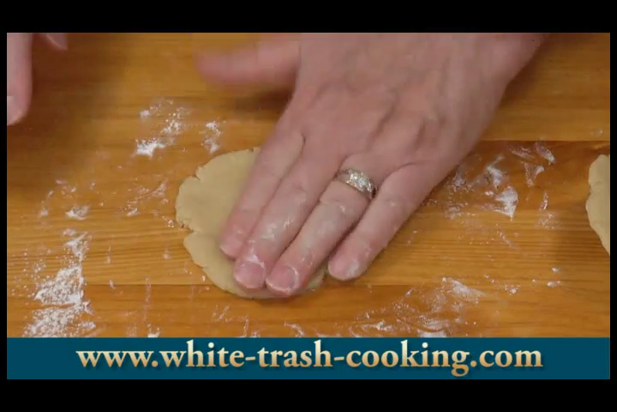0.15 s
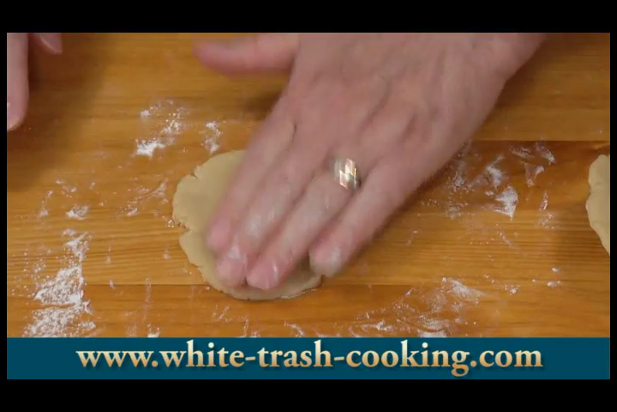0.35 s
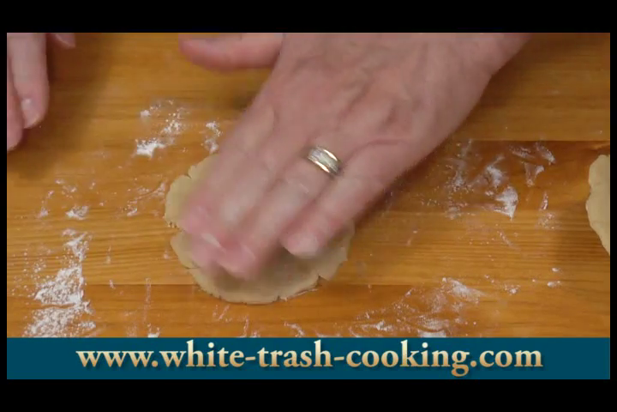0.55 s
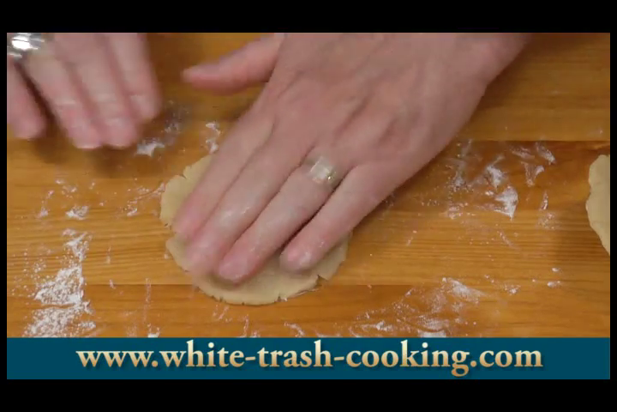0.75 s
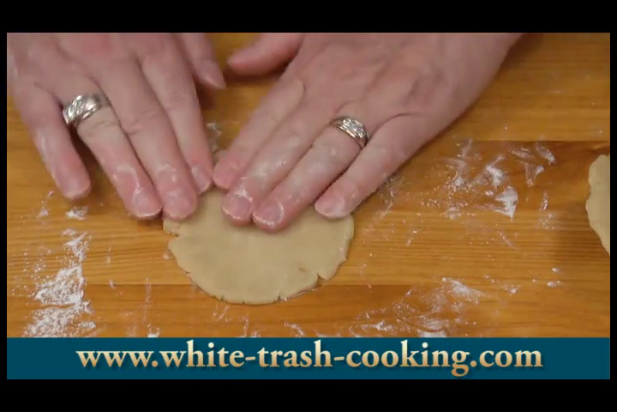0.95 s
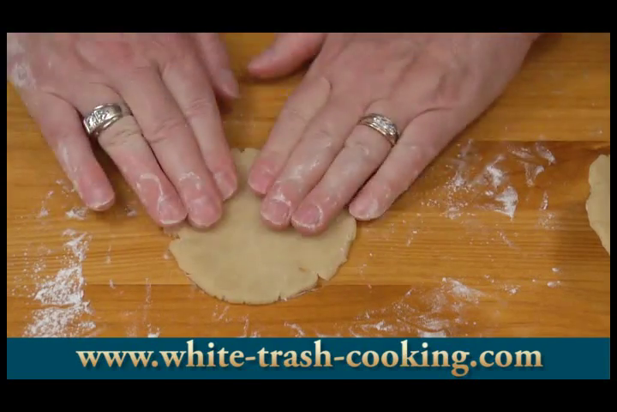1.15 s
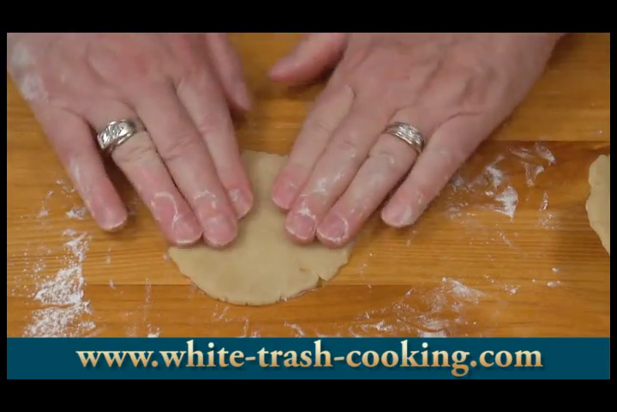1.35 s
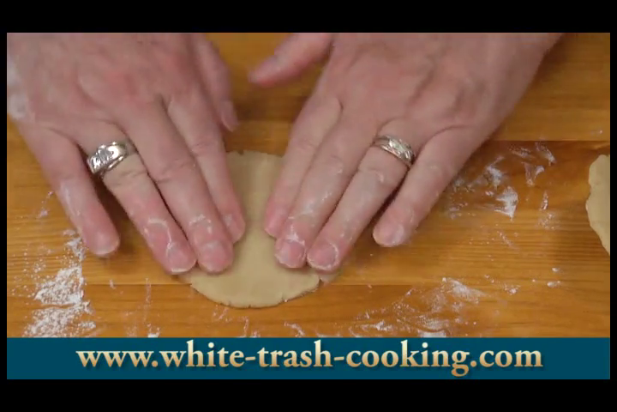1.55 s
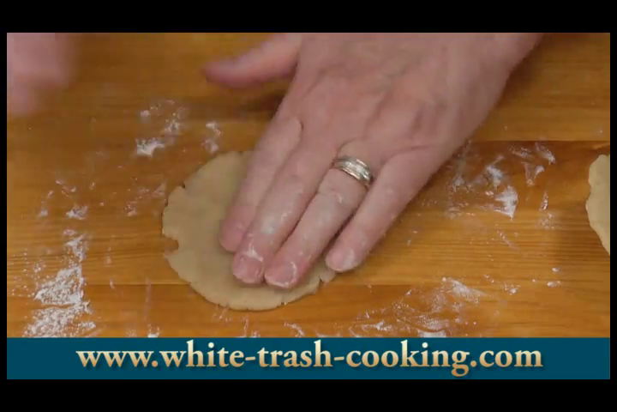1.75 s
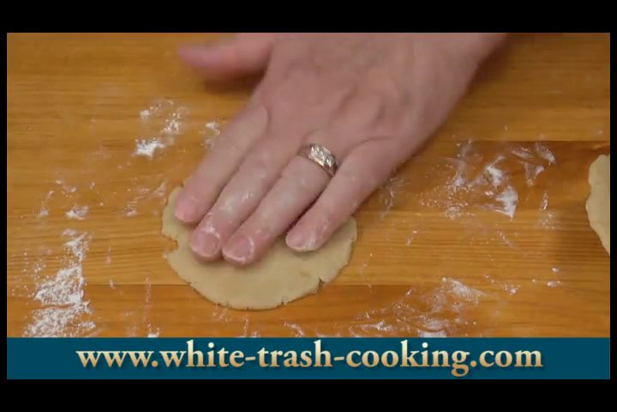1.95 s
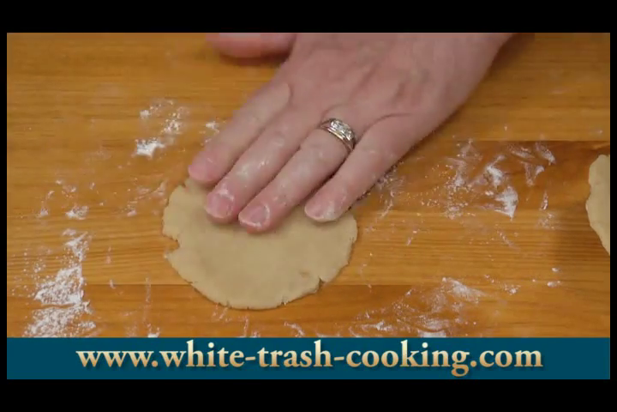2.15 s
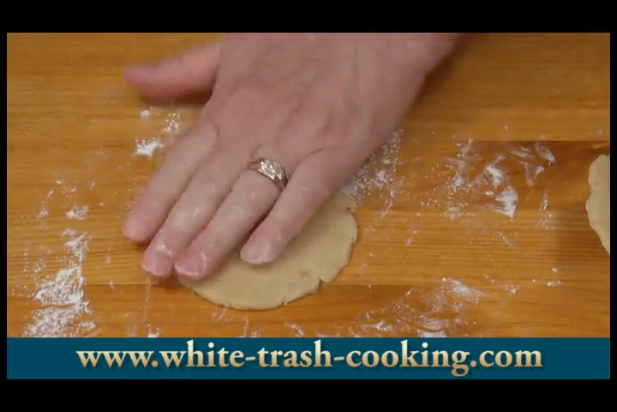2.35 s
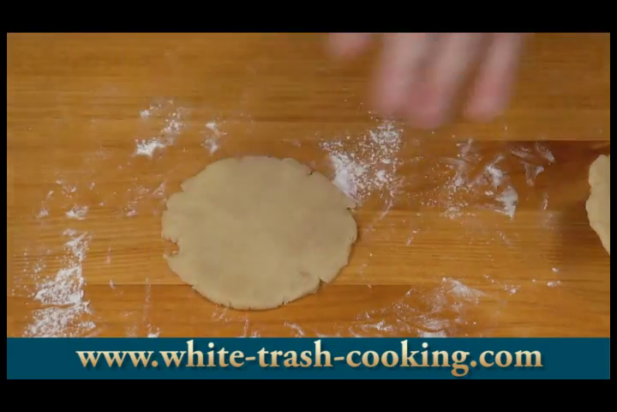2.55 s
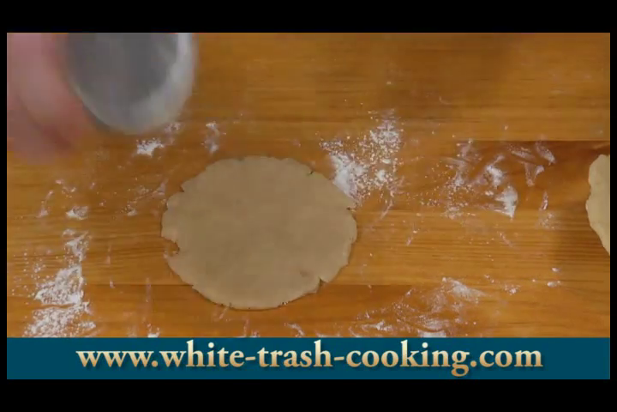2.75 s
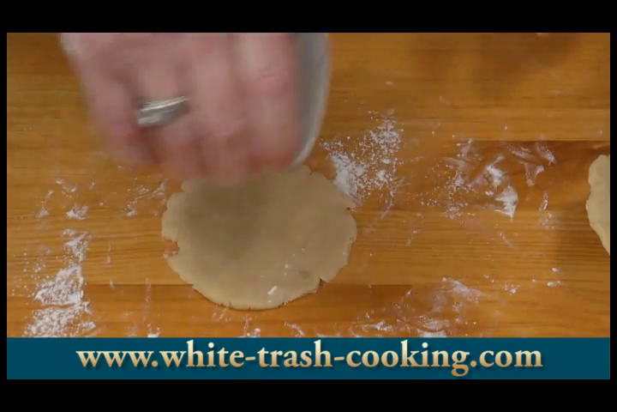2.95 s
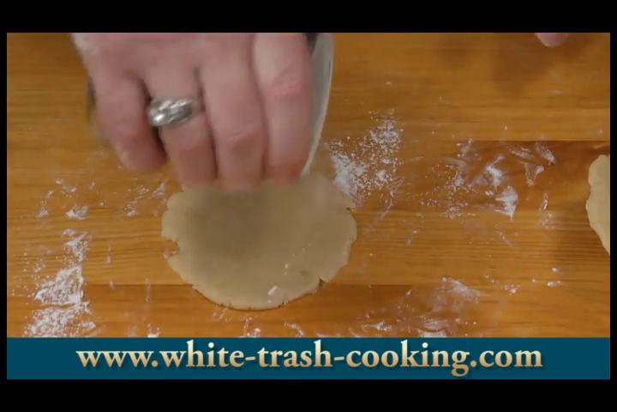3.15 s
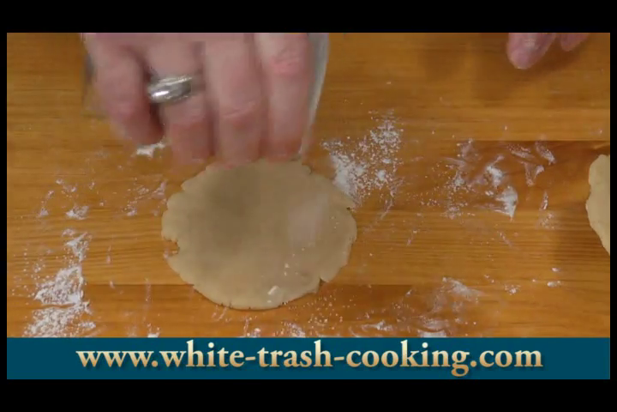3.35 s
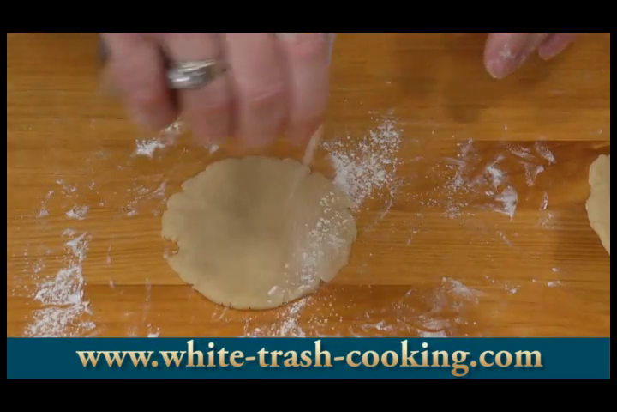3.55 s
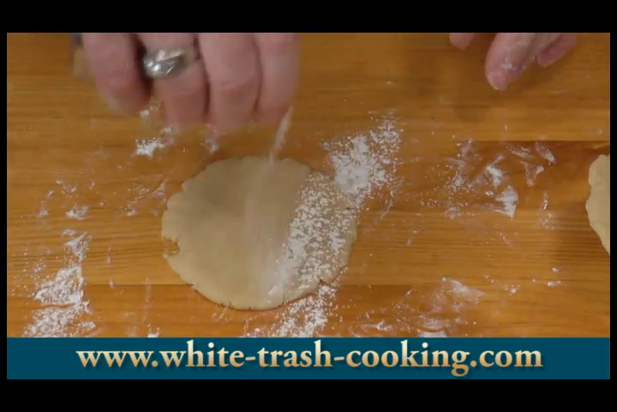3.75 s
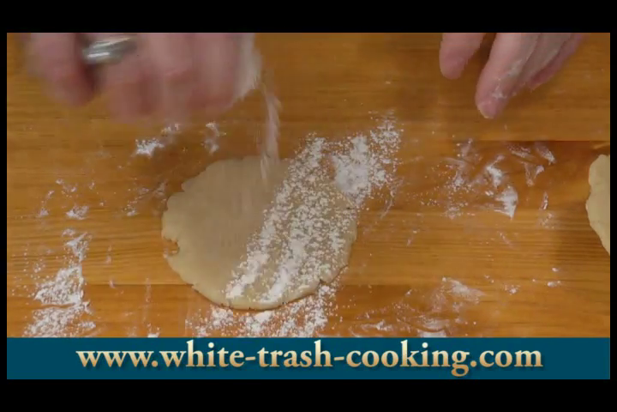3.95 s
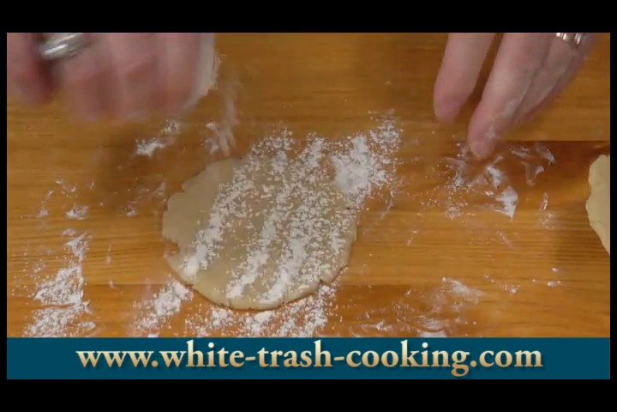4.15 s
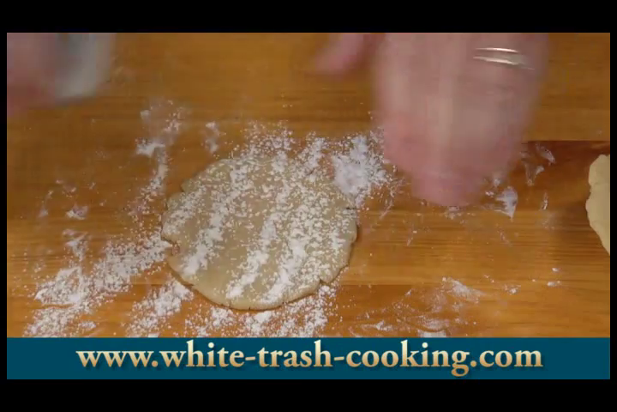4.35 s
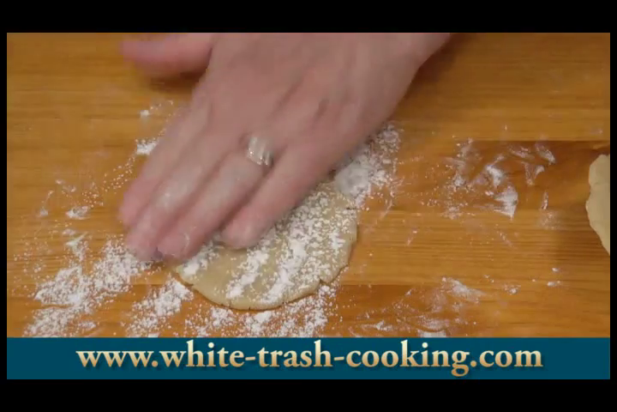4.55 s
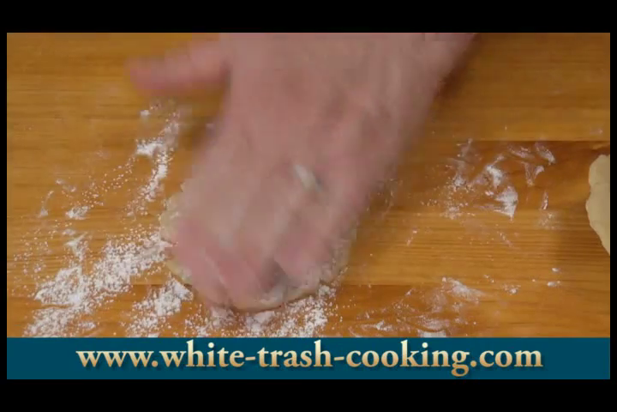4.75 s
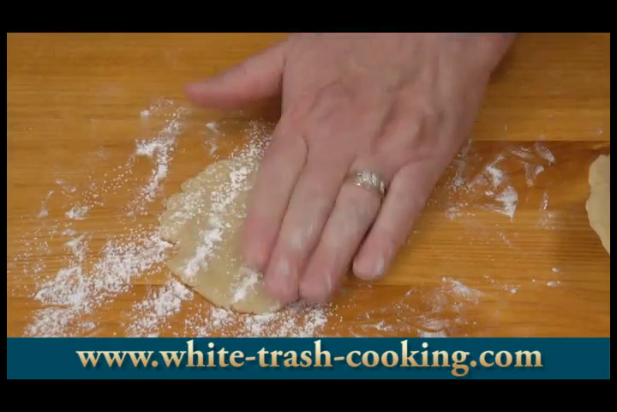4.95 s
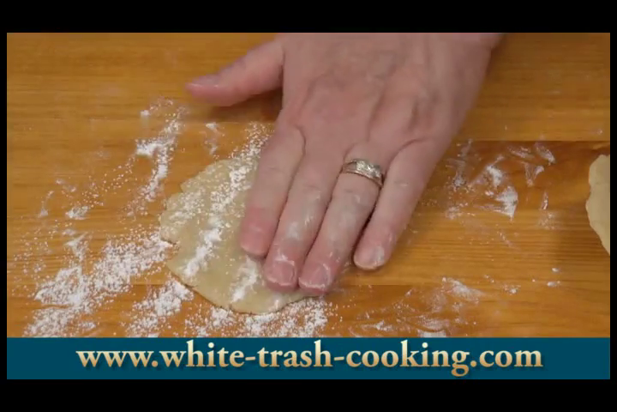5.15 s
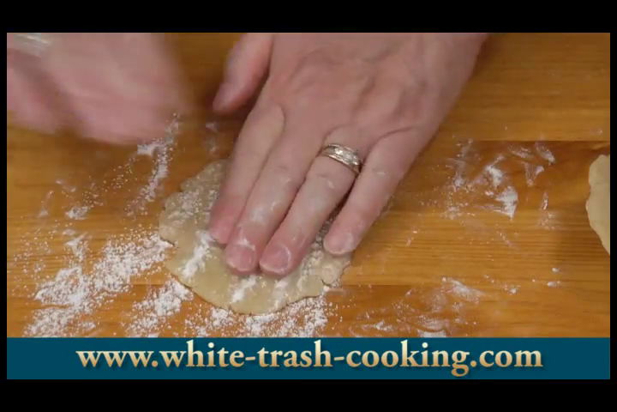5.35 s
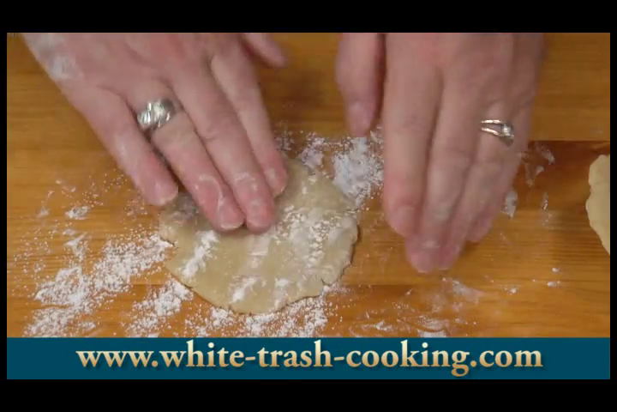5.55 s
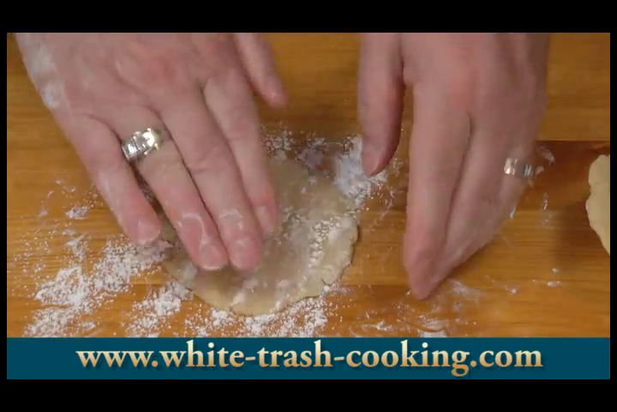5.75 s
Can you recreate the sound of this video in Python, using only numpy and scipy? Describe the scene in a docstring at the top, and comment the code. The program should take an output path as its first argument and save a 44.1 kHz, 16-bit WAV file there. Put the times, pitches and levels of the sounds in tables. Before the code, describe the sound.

Soft, irregular pats on dough thump a wooden board in a quiet kitchen, each trailed by a faint metallic rattle.

```python
"""A low hum in a quiet kitchen and a sticky tick; then hands pat dough flat on a floured wooden board.
One microphone, close above the board, with the short reflections of the room behind it.
Each pat smacks the skin, thumps the board and claps out the air trapped under the fingers.
Loose metal on the counter, tossed by the pats, rattles a moment later. Fingers brush over the dough
between pats, and the counter rumbles under the working hands."""
import sys
import numpy as np
from scipy import signal
from scipy.fft import rfft, irfft, next_fast_len
from scipy.io import wavfile

SR = 44100
rng = np.random.default_rng(int(sys.argv[2]) if len(sys.argv) > 2 else 0)


def bounce(signal):
    """Save signal as a 16-bit WAV file at the path given by the first command-line argument."""
    frames = np.transpose(np.atleast_2d(signal))
    limited = np.clip(frames, -1, 1)
    pcm = np.round(limited * 32767).astype(np.int16)
    wavfile.write(sys.argv[1], SR, pcm)


N = 256309


def from_db(db):
    """Decibels to gain."""
    return 10 ** (np.asarray(db) / 20)


def at_hz(points, hz):
    """Read a table along log frequency."""
    table_hz, values = np.transpose(points)
    return np.interp(np.log(np.maximum(hz, 1)), np.log(table_hz), values)


def noise(spectrum, count=N):
    """Noise of a given colour, rms 1."""
    size = next_fast_len(count)
    colour = from_db(at_hz(spectrum, np.fft.rfftfreq(size, 1 / SR)))
    x = irfft(rfft(rng.standard_normal(size)) * colour, size)[:count]
    return x / x.std()


def add(track, s, sound):
    """Mix a sound in at time s."""
    start = max(round(s * SR), 0)
    track[start:start + len(sound)] += sound[:N - start]


def ring(force, hz, t60):
    """One mode: each click sets a decaying sine ringing."""
    radius, angle = from_db(-60 / (t60 * SR)), 2 * np.pi * hz / SR
    return signal.lfilter([0, np.sin(angle)], [1, -2 * radius * np.cos(angle), radius ** 2], force + 1e-18)


def low_pass(x, hz):
    """Second-order low-pass."""
    return signal.sosfilt(signal.butter(2, hz, fs=SR, output="sos"), x)


# Room tone all around the microphone: f/Hz, relative level/dB
HUM_SPECTRUM = [(12, -20), (20, -6.5), (68, 1), (90, -12.5), (123, -8.5), (203, -10), (240, -7), (261, -18),
                (419, -13), (510, -23), (637, -18), (1950, -32.5), (2120, -33), (2570, -38), (15800, -42.5)]
def room_hum(level_db=-58.5):
    """The kitchen's steady, low noise."""
    return from_db(level_db) * noise(HUM_SPECTRUM)


# Rumble of the counter below the board: f/Hz, relative level/dB
RUMBLE_SPECTRUM = [(20, -32), (40, 3.5), (70, 2.5), (130, -9.5), (250, -12.5), (600, -18.5), (1500, -27),
                   (5000, -48.5), (16000, -43)]
# Its rise and fall: t/s, level/dB
LEAN_LEVELS = [(0, -61.5), (.6, -59.5), (1.5, -60.5), (2.4, -55), (3, -64.5), (3.5, -70.5), (4.5, -70.5),
               (4.8, -60.5), (5.8, -58.5)]
def counter_rumble():
    """The counter rumbles as the hands lean on it."""
    lean_db = np.interp(np.arange(N) / SR, *np.transpose(LEAN_LEVELS))
    return from_db(lean_db) * noise(RUMBLE_SPECTRUM)


# Skin on dough, close up: f/Hz, relative level/dB
SKIN_SPECTRUM = [(400, 4), (1000, 12.5), (1900, 2), (3200, -0.5), (5500, -8), (8500, -12), (12000, -8.5),
                 (16000, -19)]
def crack(db, hz, decay_s, focus_db=15, focus_q=6.1):
    """A burst of noise, strongest around the pitch that the size of the contact gives it."""
    t = np.arange(SR // 20) / SR
    burst = noise(SKIN_SPECTRUM, count=len(t))
    burst += from_db(focus_db) * signal.lfilter(*signal.iirpeak(hz, focus_q, fs=SR), burst)
    return from_db(db) * burst / burst.std() * np.exp(-t / decay_s)


# Small sticky ticks on the dough: t/s, level/dB, f/Hz
STICKY_TICKS = [(.038, -43.5, 1040), (.789, -53.5, 2340), (0.9278, -48, 8400), (1.155, -54.5, 8950),
                (2.649, -58, 3000), (4.6725, -42, 600)]
def skin(smack_decay_s=0.0035, tick_decay_s=0.0014):
    """Skin meeting or leaving the dough cracks briefly: a smack with every pat, and a few ticks."""
    out = np.zeros(N)
    for s, *_, smack_db, smack_hz in HAND_PATS:
        add(out, s, crack(smack_db, smack_hz, smack_decay_s))
    for s, tick_db, tick_hz in STICKY_TICKS:
        add(out, s, crack(tick_db, tick_hz, tick_decay_s))
    return kitchen(out, wet_db=-6)


# Decay of the room beyond the board: f/Hz, t60/s
KITCHEN_DECAY = [(60, 0.43), (300, 0.14), (1000, 0.26), (4000, 0.23), (16000, 0.15)]
def kitchen(x, wet_db, gap_s=.005):
    """The direct sound reaches the microphone, then dense reflections whose bass lasts longest."""
    t = np.arange(SR // 3) / SR
    hz = np.fft.rfftfreq(len(t), 1 / SR)
    edges_hz = np.geomspace(40, 18000, 10)
    white, tail = rfft(rng.standard_normal(len(t))), 0
    for low, high in zip(edges_hz, edges_hz[1:]):
        band = irfft(white * (hz >= low) * (hz < high), len(t))
        t60 = at_hz(KITCHEN_DECAY, np.sqrt(low * high))
        tail += band * from_db(-60 * t / t60)
    tail *= t > gap_s
    return x + from_db(wet_db) * signal.fftconvolve(x, tail / np.linalg.norm(tail))[:len(x)]


# Hiss of hands on floury dough, close up: f/Hz, relative level/dB
HISS_SPECTRUM = [(1000, 11), (3000, -9), (6000, -10), (9000, -1), (11500, -1), (13500, -2), (16000, -10)]
# Short hisses: finger strokes over the dough, and the bright snap of the hardest slap:
# centre t/s, half length/s, level/dB
SHORT_HISSES = [(.35, .018, -68), (.795, .007, -67), (2.748, .1, -75.5), (4.898, .005, -58),
                (5.059, 0.022, -65)]
def hand_hiss(lift_lead_s=0.075, lift_half_s=.011, lift_db=-73.5, grain_db=4, grain_hz=200):
    """Faint, grainy hiss as fingers lift before each pat or stroke the dough, and as the hardest slap snaps."""
    t = np.arange(N) / SR
    lifts = [(s - lift_lead_s, lift_half_s, lift_db) for s, *_ in HAND_PATS]
    swells = [from_db(db) * np.exp(-((t - s) / half) ** 2 / 2) for s, half, db in lifts + SHORT_HISSES]
    grain = low_pass(rng.standard_normal(N), grain_hz)
    return np.max(swells, axis=0) * noise(HISS_SPECTRUM) * from_db(grain_db * grain / grain.std())


# Modes of the board and counter: f/Hz, gain under a push/dB, gain under a clap/dB, t60/s
BOARD_MODES = [(55, -19.5, -45, 0.24), (78, -22.5, -40, 0.21), (129.5, -1.5, -41, 0.088),
               (148, -12.5, -18, 0.12), (205, -23.5, -8, 0.098), (244, -21, -18, 0.063),
               (284.8, -24.5, -7, 0.17), (319.6, -13, -25, 0.11), (373.8, -26.5, -17.5, 0.21),
               (423.5, -23, -30, 0.29), (469, -31.5, -28, 0.23), (512, -25, -30, 0.3),
               (625, -29, -29, 0.13), (650, -21.5, -17.5, 0.21), (696, -35, -12, 0.17),
               (755, -63, -4.5, 0.094), (795, -54, -11.5, 0.23), (833, -35, -8, 0.083),
               (875, -52, -15.5, 0.11), (960, -39, -21, 0.083), (995, -41, -11, 0.11),
               (1300, -55, -23, .18)]
# Pats right below the microphone:
# t/s, thump level/dB, clap level/dB, air pocket f/Hz, its decay/cycles, smack level/dB, smack f/Hz
HAND_PATS = [(.1977, -37.5, -65, 450, 1, -58, 2020), (.4157, -37.5, -49.5, 423, 0.85, -57, 9000),
             (.646, -37.5, -49.5, 447, 1, -51.5, 1970), (.9277, -29.5, -25, 427, 0.63, -42.5, 1600),
             (1.155, -42.5, -38.5, 425, 0.46, -51, 1900), (1.345, -39.5, -47.5, 440, .7, -62, 2000),
             (1.360, -39.5, -47, 400, .7, -64, 9000), (1.536, -43, -51, 600, 0.78, -68, 3500),
             (1.550, -45, -57, 456, .8, -60.5, 9000), (1.7461, -33, -36.5, 506, 0.72, -53, 8300),
             (1.966, -31.5, -32.5, 440, 1.4, -46, 8800), (2.173, -32, -30, 555, 2.1, -53.5, 3900),
             (2.378, -31, -38, 293, 0.89, -50, 2630), (4.618, -35, -48, 545, 2, -48, 1840),
             (4.629, -37.5, -43.5, 450, .63, -52, 2500), (4.827, -32, -67, 330, .58, -54, 1960),
             (4.885, -45, -15, 452, .62, -28.5, 830), (5.044, -43, -60, 500, .8, -55, 2070),
             (5.316, -34.5, -34, 380, 0.75, -47.5, 1790), (5.5379, -32.5, -35.5, 387, 0.52, -58, 1510),
             (5.700, -37, -49, 426, 0.86, -56.5, 2400)]
def pats(flesh_hz=380, seal_s=0.00068, clap_top_hz=1400, coupling_db=-2, push_delay_s=0.00069):
    """Soft flesh pushes the board; air trapped under the hand rings briefly and shakes it too."""
    t, out = np.arange(SR // 2) / SR, np.zeros(N)
    push = low_pass(signal.unit_impulse(len(t), round(push_delay_s * SR)), flesh_hz)
    seal = 1 - np.exp(-(t / seal_s) ** 2)
    for s, thump_db, air_db, pocket_hz, cycles, *_ in HAND_PATS:
        puff = -np.sin(2 * np.pi * pocket_hz * t) * np.exp(-t * pocket_hz / cycles) * seal
        clap = from_db(air_db) * low_pass(puff / np.abs(puff).max(), clap_top_hz)
        shake = from_db(air_db + coupling_db) * puff / np.abs(rfft(puff)).max()
        board = 0
        for k, (hz, push_db, clap_db, t60) in enumerate(BOARD_MODES):
            force = push * from_db(thump_db + push_db) + shake * from_db(clap_db) * (-1) ** k
            spot_db = rng.normal(0, 1.5)   # each landing spot favours different modes
            board += from_db(spot_db) * ring(force, hz, t60)
        add(out, s, kitchen(board, wet_db=-14.5) + kitchen(clap, wet_db=-4))
    return out


LANDING_S, TYPICAL_LANDING_DB = .015, -50
def landings(first_db, db, count=4, flight_s=.027, flight_s_per_db=.0003, loss_db=7):
    """Metal lands at first_db, again at db, then in weaker, quicker bounces: rows of t/s, level/dB."""
    rows, s, stretch = [(0, first_db)], 0, 1
    for _ in range(count):
        flight = flight_s + flight_s_per_db * (db - TYPICAL_LANDING_DB)   # harder has flown longer
        s += stretch * max(flight, LANDING_S)
        rows.append((s, db))
        db -= rng.normal(loss_db, 1.5)
        stretch = rng.uniform(.85, 1.15)
    return rows


# Click of metal on the counter: f/Hz, relative level/dB
CLICK_SPECTRUM = [(200, 8), (600, 9.5), (2500, 0), (6000, -12), (9000, -13.5), (14000, -29)]
# Ring of the metal: f/Hz, gain/dB, t60/s
METAL_MODES = [(513.4, -5, 0.2), (578, -10.5, 0.13), (660, -8.5, 0.096), (735, -8.5, 0.085),
               (897, -7, 0.094), (1067.5, -5, 0.13), (1348, -12.5, 0.088), (1738, -8.5, 0.09),
               (1829, -9, 0.07), (2010, -17.5, .12), (2254, -9.5, 0.032), (2487, -9, 0.069),
               (2540, -7, 0.046), (2778, -8.5, 0.06), (3545, -17, 0.058), (3870, -15, .05),
               (4083, -4, 0.038), (4003, -7, 0.052), (4590, -6.5, 0.046), (4690, -4.5, 0.03),
               (4825, -5, 0.037), (5060, -11, 0.05), (5630, -19, .12), (6230, -19, 0.05),
               (7250, -12.5, 0.06), (8260, -8, 0.083), (8130, -18, 0.044), (8650, -13.5, 0.046),
               (11150, -19.5, 0.11)]
def chatter(rows, count=7, spread_db=3, touch_loss_db=8.5, ring_db=-12, pivot_hz=3000,
            click_db=-2.5, click_s=0.0015, detune=0.0036):
    """Each landing is a quick run of weakening touches that click and set the metal ringing."""
    s, db = np.transpose(rows)[:, :, None]
    gaps = rng.uniform(.4, 1.6, (len(rows), count))
    progress = (np.cumsum(gaps, axis=1) - gaps[:, :1]) / (count - 1)
    onsets = ((s + LANDING_S * progress) * SR).astype(int).ravel()
    touch_db = db - touch_loss_db * progress
    tilt_db = .3 + .25 * (db - TYPICAL_LANDING_DB)   # harder is brighter
    touches = np.bincount(onsets, from_db(touch_db + click_db).ravel(), SR // 4)
    click_envelope = signal.lfilter([1], [1, -np.exp(-1 / (click_s * SR))], touches + 1e-18)
    out = click_envelope * noise(CLICK_SPECTRUM, count=len(touches))
    for hz, mode_db, t60 in METAL_MODES:
        blow_db = touch_db + ring_db + mode_db + tilt_db * np.log(hz / pivot_hz)
        strength = from_db(blow_db + rng.normal(0, spread_db, gaps.shape)).ravel()
        polarity = np.sign(rng.standard_normal(len(onsets)))
        blows = np.bincount(onsets, strength * polarity, len(touches))
        out += ring(blows, hz * rng.normal(1, detune), t60)   # where it lands shifts the modes a little
    return out


# Metal nearby on the counter, coming down about 36 ms after a pat or slipping later:
# t/s, first landing level/dB, second landing level/dB
METAL_DROPS = [(.235, -53.5, -67.5), (.683, -60, -60.5), (.963, -50, -57), (1.052, -55, -66),
               (1.191, -54.5, -50.5), (1.381, -49, -54.5), (1.572, -58.5, -62), (1.613, -57.5, -68),
               (1.782, -50.5, -55.5), (2.032, -42.5, -50.5), (2.111, -56, -62), (2.208, -49.5, -49.5),
               (2.419, -46.5, -40.5), (4.64, -57, -63.5), (4.657, -46, -42.5), (4.709, -47.5, -64),
               (4.868, -52, -45.5), (4.941, -49.5, -57), (5.352, -52.5, -59.5), (5.396, -57.5, -64),
               (5.572, -52, -63), (5.665, -59, -67.5), (5.736, -52.5, -63)]
def rattle():
    """The loose metal lands, bounces and settles on the counter."""
    out = np.zeros(N)
    for s, first_db, second_db in METAL_DROPS:
        add(out, s, chatter(landings(first_db, second_db)))
    return kitchen(out, wet_db=-7)


def scene():
    """The kitchen in mono, from above the board."""
    return (room_hum() + counter_rumble() + skin() + hand_hiss() + pats() + rattle())[None]


def record(dry, low_cut_hz=29, high_cut_hz=15900):
    """The microphone chain cuts the deepest bass and the very top."""
    dry = signal.sosfilt(signal.butter(4, low_cut_hz, "high", fs=SR, output="sos"), dry)
    return signal.sosfilt(signal.ellip(10, .1, 70, high_cut_hz, fs=SR, output="sos"), dry)


dry = scene()
out = record(dry)
bounce(out)
```